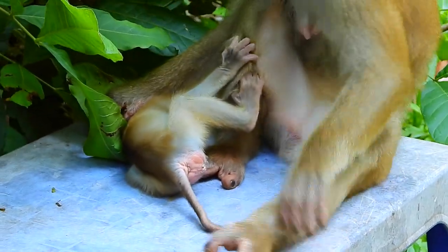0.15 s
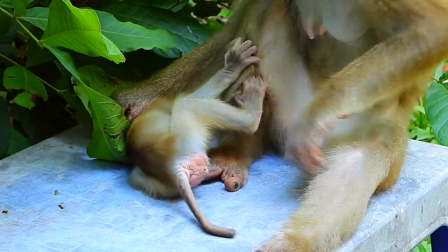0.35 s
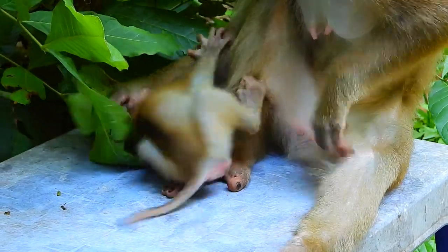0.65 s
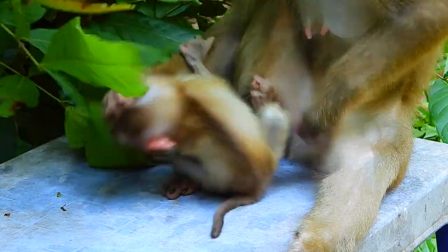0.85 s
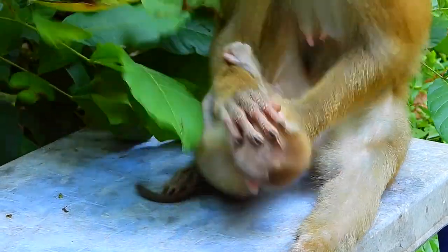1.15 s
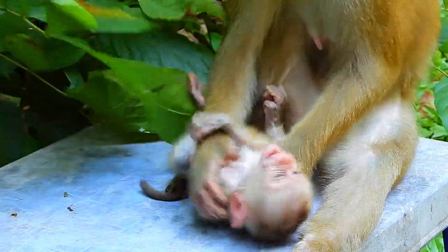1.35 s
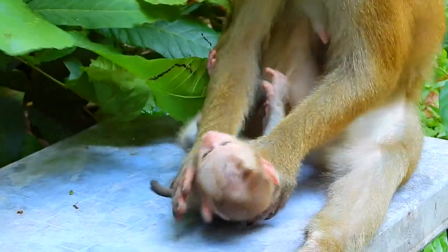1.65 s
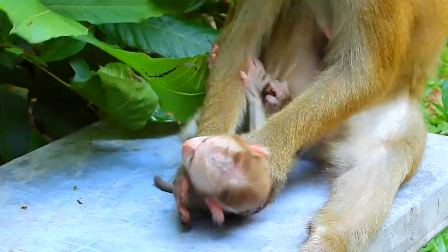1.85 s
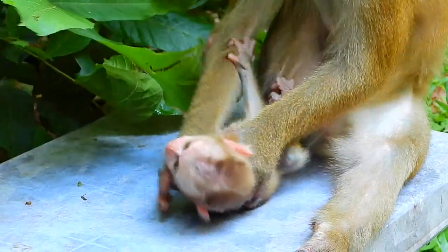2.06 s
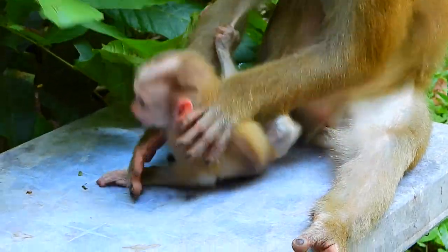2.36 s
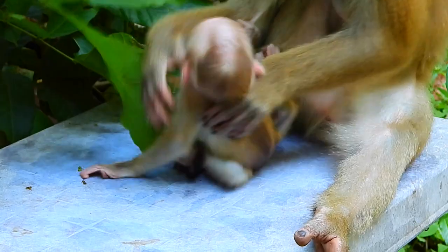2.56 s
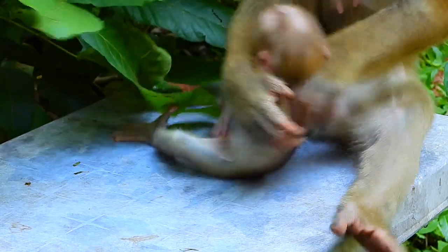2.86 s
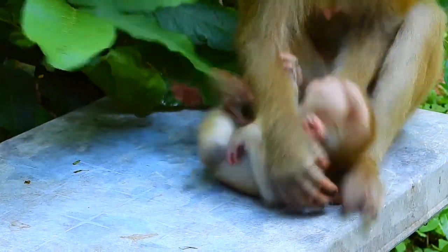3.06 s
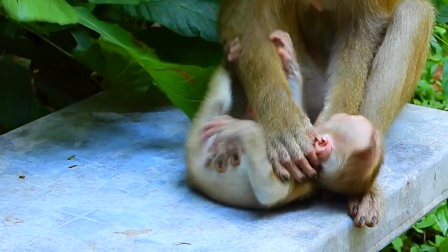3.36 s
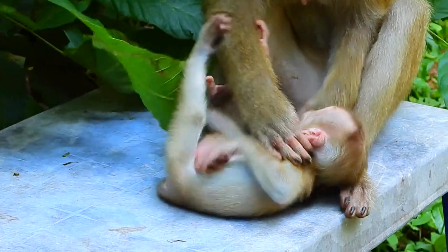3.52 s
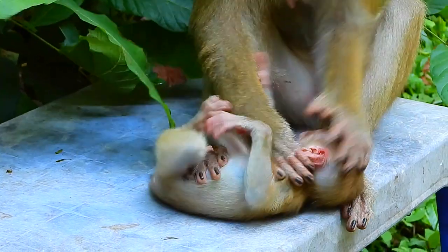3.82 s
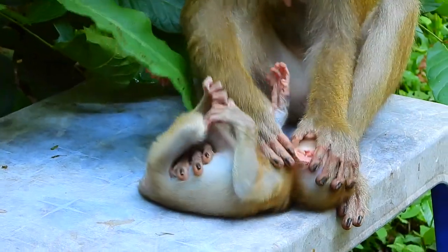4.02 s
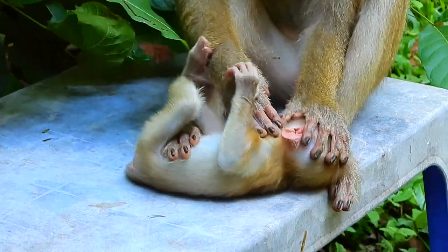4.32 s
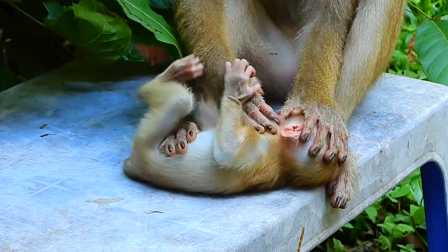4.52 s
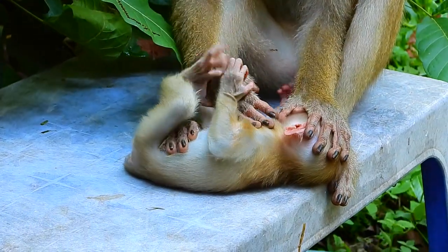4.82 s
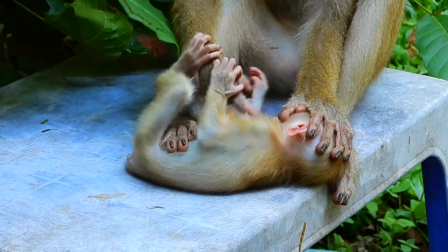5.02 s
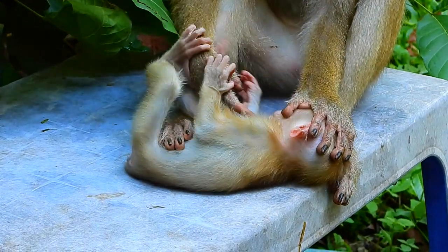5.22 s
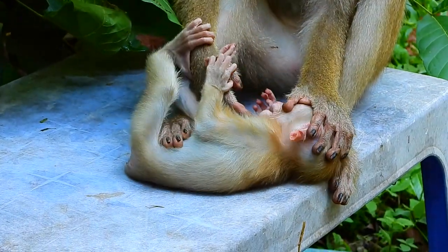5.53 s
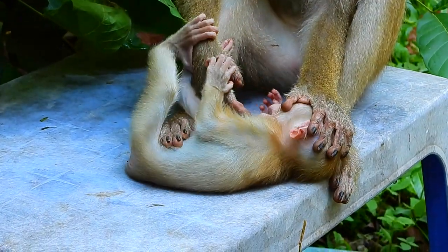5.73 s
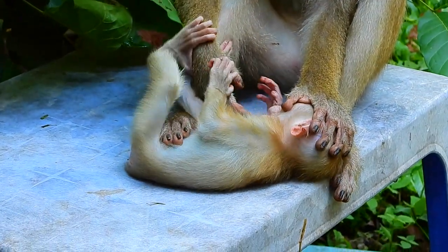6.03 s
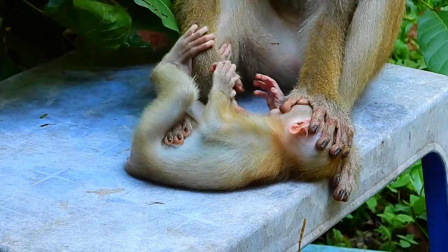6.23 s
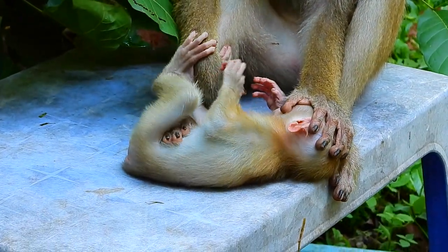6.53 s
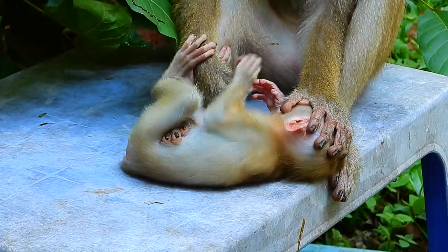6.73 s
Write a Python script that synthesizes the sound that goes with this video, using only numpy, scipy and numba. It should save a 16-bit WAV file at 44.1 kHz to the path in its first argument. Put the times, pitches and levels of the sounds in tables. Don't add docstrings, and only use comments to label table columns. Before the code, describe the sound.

Outdoors under trees, an infant monkey on a slab screams a metre or two from the microphone. Two sharp shrieks come early, several more crowd the middle, each short, shrill, wavering and raspy at the edges. Between them are small husky huffs and barks. The end is calmer: a cracked coo, a cluster of breathy barks, leaf or claw ticks and faint low hoots from far monkeys, over a leaf hiss that ducks and slowly returns.

```python
import sys
import numpy as np
from scipy import signal
from scipy.io import wavfile
from scipy.ndimage import uniform_filter1d
from numba import njit

SR = 44100
rng = np.random.default_rng(int(sys.argv[2]) if len(sys.argv) > 2 else 0)


def master_out(mix):
    frames = np.transpose(np.atleast_2d(mix))
    ceiling = np.clip(frames, -1, 1)
    pcm = np.round(ceiling * 32767).astype(np.int16)
    wavfile.write(sys.argv[1], SR, pcm)


def how_loud(loudness_db):
    steps = np.asarray(loudness_db, float) / 20
    return 10 ** steps


N = 303408


def unit(x):
    return x / np.sqrt(np.mean(x ** 2))


def smooth(x, s):
    return uniform_filter1d(x, int(s * SR))


def late(x, s):
    return np.roll(x, int(s * SR))


def turn(hz):
    return 2 * np.pi * np.cumsum(hz) / SR


def pan(x, pan_db):
    return x * how_loud(np.array([pan_db / 2 + np.zeros(N), -pan_db / 2 + np.zeros(N)]))


def walk(rate):
    k = int(SR / rate)
    steps = np.repeat(rng.standard_normal(N // k + 1), k)
    return unit(uniform_filter1d(uniform_filter1d(steps, k), k)[:N])


def played(calls, fade=0.0059):
    t = np.arange(N) / SR
    s, *columns = np.transpose(np.vstack(calls))
    gate = sum(np.clip(np.minimum(t - c[0][0], c[-1][0] - t) / fade + 1, 0, 1) for c in calls)
    return np.minimum(gate, 1), [np.interp(t, s, c) for c in columns]


def swelling(rows, peak, rise_db, fall_db):
    calls = []
    for s, length, db, *held in rows:
        peak_s = s + np.clip(peak, .05, .95) * length
        calls.append([(s, db - rise_db, *held), (peak_s, db, *held), (s + length, db - fall_db, *held)])
    return calls


def level_first(rows):
    return [(s, length, db, hz) for s, length, hz, db in rows]


@njit
def svf(x, hz, width):
    y, b, l = np.empty(len(x)), 0., 0.
    for i in range(len(x)):
        g, k = np.tan(np.pi * hz[i] / SR), width[i] / hz[i]
        v = (b + g * (x[i] - l)) / (1 + g * (g + k))
        b, l, y[i] = 2 * v - b, l + 2 * g * v, k * v
    return y


def band(x, hz, width_hz):
    hz, width = np.clip(hz + np.zeros(N), 20, .45 * SR), width_hz + np.zeros(N)
    return unit(svf(svf(x, hz, width), hz, width))


def highest_hiss(puff, hz, width_hz):
    return np.array([band(puff * noise, hz, width_hz) for noise in rng.standard_normal((2, N))])


# [f/Hz, level/dB per Hz]
FOREST_SPECTRUM = [(24, -67), (40, -38), (91, -17), (191, -5), (845, -4), (2220, -10), (6300, -9.5),
                   (10900, -26)]
# [t/s, level/dB]
CAMERA_GAIN = [(0, -0.5), (.85, -2.5), (1.0, -14), (1.35, -8), (1.7, -8), (2.5, -6), (2.85, -10.5),
               (3.95, -16.5), (4.5, -14.5), (5.55, -6.5), (5.75, -3), (6.88, -1.5)]


def forest():
    high_db = played([CAMERA_GAIN])[1][0]
    low_db = 1.12 * high_db
    hz_at, db_at = np.transpose(FOREST_SPECTRUM)
    out, rustle = 0, walk(18)
    for hz in 45 * 2 ** np.arange(0, 8.1, .5):
        share = np.clip(np.log2(hz / 500) / 6.8, 0, 1)
        duck_db = (1 - share) * low_db + share * high_db
        band_db = np.interp(np.log(hz), np.log(hz_at), db_at) + 10 * np.log10(hz)
        db = band_db + duck_db + 1.0 * rustle + 1.2 * walk(4.8)
        mid, side = (band(rng.standard_normal(N), hz, min(hz * 0.5, 3500)) for _ in range(2))
        width = np.clip(0.28 + hz / 9000, 0, 1)
        out = out + how_loud(db) * (mid + width * side * np.array([[1], [-1]]))
    return pan(out * how_loud(-77.0), -2.45)


# [t/s, level/dB, f/Hz]
COO_CALLS = [
    [(0, -35, 912.5), (.025, -35, 949), (.085, -33, 805), (.15, -42, 846), (.185, -45.5, 955),
     (.26, -68, 985)],
    [(5.605, -48, 1227), (5.63, -46, 980.5), (5.655, -39.5, 623), (5.69, -49, 783), (5.72, -42, 953),
     (5.745, -46.5, 788.5), (5.79, -47.5, 835), (5.82, -52, 808), (5.89, -56, 818)],
]
# [multiple of pitch, level/dB]
COO_OVERTONES = [(1, 1.5), (2, -4), (3, -8), (4, -10.5), (5, -12), (6, -17.5), (7, -19), (8, -21)]


def coos():
    closed_db, open_db, opening_db_per_s = -20, -4, 125
    gate, (db, hz) = played(COO_CALLS, fade=0.0045)
    age_s = played([[(c[0][0], 0), (c[-1][0], c[-1][0] - c[0][0])] for c in COO_CALLS])[1][0]
    upper_db = np.minimum(closed_db + opening_db_per_s * age_s, open_db)
    phase = turn(smooth(hz, 0.0037) * (1 + 0.014 * walk(120)))
    stack = 0
    for k, order_db in COO_OVERTONES:
        tilt_db = np.log(k) * (upper_db + 7) / 2
        breakup_db = (2.5 + 0.94 * np.log(k)) * walk(80)
        stack = stack + how_loud(order_db + tilt_db + breakup_db) * np.sin(k * phase)
    return pan(2.13 * gate * how_loud(db - COO_OVERTONES[0][1]) * stack, -3.5)


def echo(x):
    trunk_t60_s, trunk_db = 1.5, -19.5
    near_t60_s, near_db = .06, -7
    t = np.arange(SR) / SR
    trunks = how_loud(trunk_db - 60 * t / trunk_t60_s) * np.clip(t / 0.0147, 0, 1) / np.sqrt(trunk_t60_s * SR / 14)
    near = how_loud(near_db - 60 * t / near_t60_s) / np.sqrt(near_t60_s * SR / 14)
    answer = (trunks + near) * rng.standard_normal((2, SR))
    return signal.fftconvolve(x.mean(axis=0)[None], answer, axes=1)[:, :N]


# [t/s, peak level/dB, f/Hz]
LEAF_TICKS = [(0.089, -27.5, 1710), (0.194, -30.5, 2550), (0.23, -34.5, 2890), (0.2918, -33, 4130),
              (0.455, -42, 4630), (0.563, -38, 2740), (2.362, -48, 2350), (3.7215, -36.5, 4563),
              (4.75, -49.5, 3960), (5.2042, -42.5, 3380), (5.279, -51, 3560), (5.8464, -43, 1660),
              (6.0164, -43.5, 3300), (6.0652, -36.5, 2250), (6.0815, -46, 1530), (6.4333, -39, 2220),
              (6.4601, -27.5, 2240)]


def ticks():
    out, t = np.zeros(N + 1024), np.arange(1024) / SR
    for (s, db, hz), noise in zip(LEAF_TICKS, rng.standard_normal((len(LEAF_TICKS), 1024))):
        crackle = 0.84 * np.gradient(uniform_filter1d(noise, size=7))
        snap = (np.sin(2 * np.pi * hz * t) + crackle) * np.exp(-t / 0.0023)
        out[int(s * SR):int(s * SR) + 1024] += 1.68 * snap * how_loud(db)
    return pan(out[:N], -12.0)


# [start t/s, length t/s, mouth level/dB, mouth f/Hz, brightness level/dB]
SWELLING_HUFFS = [(.635, 0.043, -29.5, 1328, -14), (1.682, 0.11, -30, 1471, -3.5),
                  (2.02, 0.084, -44, 1130, -1), (4.088, 0.051, -47.5, 1264, 13),
                  (4.35, 0.085, -46, 1093, 10), (6.727, 0.05, -34, 1330, 15)]
# [start t/s, length t/s, mouth level/dB, mouth f/Hz, brightness level/dB]
ABRUPT_BARKS = [(.71, .025, -50, 640, 15.5), (1.478, 0.074, -35.5, 1521, -12),
                (1.63, 0.038, -39.5, 1014, 3), (2.254, .03, -41.5, 709, -9), (3.8, 0.087, -38, 1338, 11.5),
                (4.168, 0.042, -53, 451, 20.5), (4.579, .03, -43, 675, -29),
                (5.407, .035, -36.5, 1610, -18), (5.603, 0.092, -37, 1670, 0.5),
                (6.316, 0.062, -27, 1200, -3.5), (6.452, 0.038, -33, 1050, -7.5),
                (6.532, 0.076, -27, 1223, 2.5)]


def barks():
    calls = swelling(ABRUPT_BARKS, peak=.15, rise_db=5, fall_db=17)
    calls += swelling(SWELLING_HUFFS, peak=0.45, rise_db=7, fall_db=17)
    gate, (db, low_hz, mid_db) = played(sorted(calls), fade=0.00089)
    throat_hz = 3142
    push_db = db + np.maximum(mid_db, 0) + 30
    treble_db = 0.89 * mid_db - 4.5 + 0.28 * push_db
    cycle = turn(330 * (1 + .12 * walk(200))) / (2 * np.pi) % 1
    puff = np.exp(-cycle / .4) * how_loud(2.0 * walk(250))
    air = (rng.standard_normal(N) + 0.85) * puff
    effort = smooth(gate * how_loud(db), 0.0022)
    opening = late(smooth(gate, 0.012), 0.011)
    jaw = (.88 + .12 * opening) * (1 + .04 * walk(60))
    spread = np.clip(1 + mid_db / 30, .15, 1)
    low = band(air, low_hz / jaw, 180 + 170 * spread)
    low = low + .5 * spread * band(air, 1.55 * low_hz / jaw, 300) + .3 * spread * band(air, 650, 600)
    middle = band(air, throat_hz * jaw, 550) + .9 * band(air, 4450 * jaw, 700) + .4 * band(air, 2600, 1500)
    treble = band(air, 6900 * jaw, 450) + 1.5 * band(air, 5800 * jaw, 1962)
    treble = treble + .5 * highest_hiss(puff, 9350, 2570)
    bright = late(effort * how_loud(mid_db), 0.0019) * (0.41 + 0.5 * opening) * middle
    bright = bright + late(effort * how_loud(treble_db), 0.00423) * (0.17 + 0.87 * opening) * treble
    return pan(1.22 * effort * low + 0.94 * bright, -1.74)


def mouth(cries):
    opening_s, closing_s = 0.023, .02
    t = np.arange(N) / SR
    gape = .05
    for c in cries:
        gape = gape + np.clip(np.minimum((t - c[0][0]) / opening_s, (c[-1][0] - t) / closing_s + .2), 0, 1)
    return np.clip(gape, 0, 1)


CLEAR_ROUGHNESS = [.3, .14, .45, .28, .15, .07, .35, .12]
FOLD_GRIPS = [(.4, .65), (.55, .2), (1.2, .5), (.7, .15), (.85, .7), (.95, .4), (.4, .38), (.9, .7),
              (.6, .6)]


def strain(cries):
    tail_s, tail_rough, rest_shake = .035, .65, .1
    fraying = [[(c[0][0], r), (c[-1][0] - tail_s, r), (c[-1][0], tail_rough)]
               for c, r in zip(cries, CLEAR_ROUGHNESS)]
    rough = played(fraying)[1][0]
    gripped = [[(s, *g), (s + length, *g)] for (s, length, *_), g in zip(FOLD_SPELLS, FOLD_GRIPS)]
    gate, (shake, harsh) = played(gripped, fade=.012)
    return np.maximum(rough, gate * harsh), rest_shake + gate * (shake - rest_shake)


# [t/s, whistle f/Hz, effort level/dB]
FIRST_SCREAMS = [
    [(.831, 3457, -11.5), (.846, 3594, -10), (.862, 3600, -23.5), (.888, 3790, -14.5), (.906, 4050, -18),
     (.914, 4950, -22.5), (.932, 4620, -14), (.942, 4230, -17), (.975, 4130, -34)],
    [(1.135, 3640, -43), (1.161, 3568, -21.5), (1.184, 3610, -18), (1.192, 5296, -17), (1.222, 5150, -25.5),
     (1.23, 4770, -21), (1.247, 4685, -24.5), (1.256, 3630, -20), (1.272, 3410, -32)],
    [(2.542, 1707, -34.5), (2.56, 2870, -14.5), (2.58, 3107, -9.5), (2.62, 3977, -13.5),
     (2.665, 4230, -34.5)],
    [(2.775, 3653, -14.5), (2.79, 3950, -12.5), (2.818, 4270, -10.5), (2.845, 4640, -22),
     (2.865, 4260, -23), (2.96, 4340, -21.5), (2.982, 4420, -23.5), (2.992, 4825, -25), (3.05, 4600, -34)],
]
SECOND_SCREAMS = [
    [(3.15, 3357, -40), (3.163, 3853, -31), (3.17, 4324, -16), (3.19, 4680, -24.5), (3.235, 4795, -23.5),
     (3.3, 4390, -22), (3.503, 4270, -27.5), (3.52, 5390, -27), (3.545, 5220, -30)],
    [(3.55, 5130, -25), (3.572, 5100, -22.5), (3.59, 4515, -27.5), (3.608, 4167, -30), (3.63, 4780, -12.5),
     (3.65, 4230, -34)],
    [(3.778, 2090, -39), (3.793, 3710, -15.5), (3.812, 4470, -24), (3.833, 4150, -24.5),
     (3.866, 4608, -11.5), (3.897, 4826, -35), (3.913, 4523, -18), (3.93, 4610, -34)],
    [(4.164, 4304, -19.5), (4.17, 4496, -12), (4.21, 4555, -32.5)],
]
# [treble level/dB, low rasp level/dB], both over the cry
CRY_COLOURS = [(-10, -17.5), (-10.5, -26.5), (-8, -9.5), (-11, -17), (-10.5, -22.5), (-18, -25), (-14, -21),
               (-20, -24)]
# [start t/s, length t/s, f/Hz, level/dB]
FOLD_SPELLS = [(0.844, 0.029, 593, -33.5), (.905, 0.03, 704.6, -37.5), (1.145, 0.0392, 748.4, -39.5),
               (1.196, .025, 725, -60), (2.826, .14, 681.6, -38.5), (3.2, .13, 880, -42.5),
               (3.337, 0.18, 836.6, -56.5), (3.805, 0.032, 642.4, -49), (3.854, .06, 627, -38)]
# [t/s, left minus right level/dB]
HEAD_TURNS = [(.8, -1.5), (2.6, -2), (3.35, -5), (4.2, -2.5)]


def screams():
    cries = FIRST_SCREAMS + SECOND_SCREAMS
    gate, (hz, db) = played(cries, fade=0.006)
    hz = smooth(hz, 0.0061)
    colour = played([[(c[0][0], *k), (c[-1][0], *k)] for c, k in zip(cries, CRY_COLOURS)])[1]
    treble_db, rasp_db = colour[0] - 0.47 * (db + 22), colour[1] - 0.18 * (db + 22)
    rough, shake = strain(cries)
    spells = swelling(level_first(FOLD_SPELLS), peak=.3, rise_db=5.5, fall_db=11.5)
    sagging = [[a, b, (*c[:2], c[2] * (1 - .09))] for a, b, c in spells]
    fold_gate, (fold_db, fold_hz) = played(sagging, fade=0.0187)
    fold = turn(fold_hz * (1 + 0.062 * walk(150)))
    grip = shake * how_loud(1.6 * walk(70))
    hops = np.repeat(rng.random(N // 500 + 1) ** 2, 500)[:N]
    waver = 0.053 * walk(120) + 0.0526 * walk(900) + .2 * hops
    phase = turn(hz * (1 + rough * waver)) + grip * np.sin(fold)
    puff = (1 + 0.5 * grip * np.cos(fold)) * how_loud(rough * (2.0 * walk(170) + 2.1 * walk(600)))
    air = rng.standard_normal(N) * puff
    claps = np.gradient(np.gradient(np.exp(25 * (np.cos(fold) - 1))))
    twin = np.clip(3 * rough, 0, .5) * np.sin(phase + turn(hz * (.04 + .035 * walk(70))))
    whistle = unit(puff * (np.sin(phase) + twin)) + .7 * rough * band(air, 1.12 * hz, 1100)
    overtones = unit(puff * (np.sin(2 * phase) + 0.11 * np.sin(3 * phase)))
    strands = .8 * grip * band(claps * how_loud(4.0 * walk(90)), 6800, 3000)
    patchy = air * how_loud(3.0 * walk(50))
    hiss = band(patchy, 1.37 * hz * (1 + 0.1 * walk(45)), 1560) + .5 * band(air, 7800, 1800)
    hiss = hiss + 0.53 * highest_hiss(puff, 9970, 4200)
    clear = np.clip(.8 - rough - .5 * shake, .1, 1)
    treble = clear * overtones + rough ** 0.17 * hiss + strands
    rasp = (0.46 + grip) * band(air, 2880, 910)
    gape = mouth(cries[:4] + [cries[4] + cries[5]] + cries[6:])
    voice = 0.86 * whistle + 0.79 * how_loud(rasp_db) * rasp
    voice = voice + 0.92 * gape * how_loud(treble_db + 2.5 * walk(35.084)) * treble
    hum = np.sin(fold) + .3 * np.sin(2 * fold) + .2 * np.sin(3 * fold)
    folds = .7 * fold_gate * how_loud(fold_db + 3.0 * walk(60)) * hum
    return pan(gate * how_loud(db) * voice + folds, played([HEAD_TURNS])[1][0])


# [start t/s, length t/s, f/Hz, level/dB]
LOW_HOOTS = [
    (3.08, 0.047, 310.3, -54),
    (4.6, 0.55, 273.8, -67.5),
    (6.62, 0.142, 298, -49),
    (6.83, .05, 333, -55),
]
HIGHER_HOOTS = [
    (4.82, 0.27, 530, -63),
    (6.589, 0.066, 448, -48),
    (6.75, 0.05, 790, -47),
]


def hoots():
    out = 0
    for rows in (LOW_HOOTS, HIGHER_HOOTS):
        calls = swelling(level_first(rows), peak=1.0, rise_db=1.5, fall_db=1.5)
        gate, (db, hz) = played(calls, fade=0.0059)
        tone = np.sin(turn(hz * (1 + 0.00406 * walk(27))))
        out = out + np.sqrt(2) * gate * how_loud(db + 2.0 * walk(25)) * tone
    return pan(out, -6.5)


def scene():
    near = coos() + ticks() + barks() + screams()
    return near + echo(near) + hoots() + forest()


def band_limit(x):
    return signal.sosfilt(signal.butter(12, 15780, fs=SR, output="sos"), x)


def record(dry):
    thump = signal.sosfilt(signal.butter(2, [60, 500], "bandpass", fs=SR, output="sos"), dry ** 2)
    heard = signal.sosfilt(signal.butter(2, 13000, fs=SR, output="sos"), dry) + 0.024 * thump
    return band_limit(np.tanh(0.83 * heard) / 0.99)


dry = scene()
out = record(dry)
master_out(out)
```